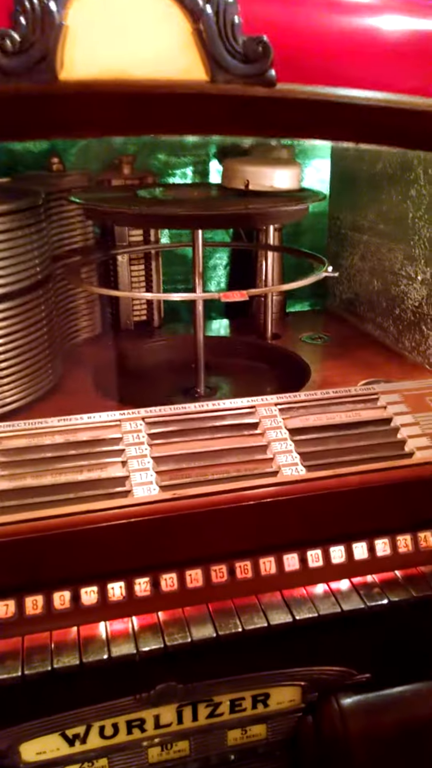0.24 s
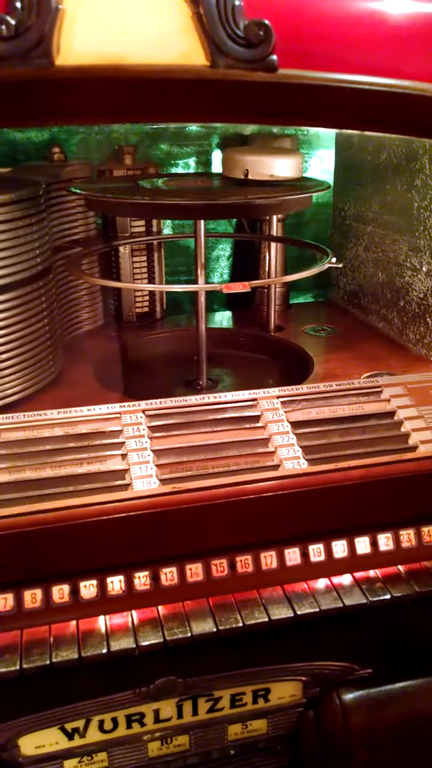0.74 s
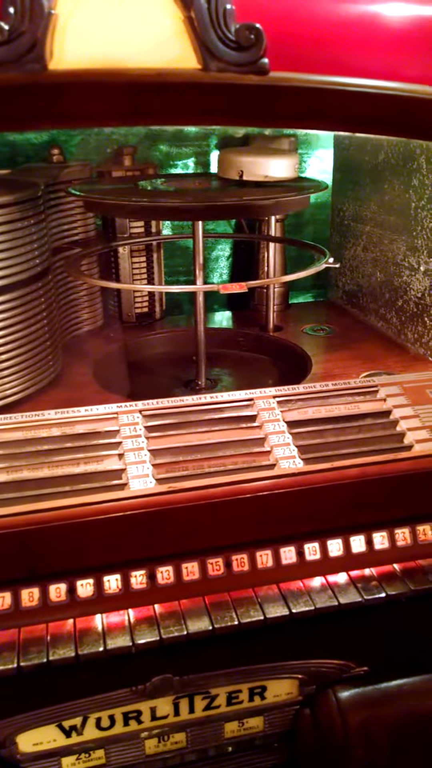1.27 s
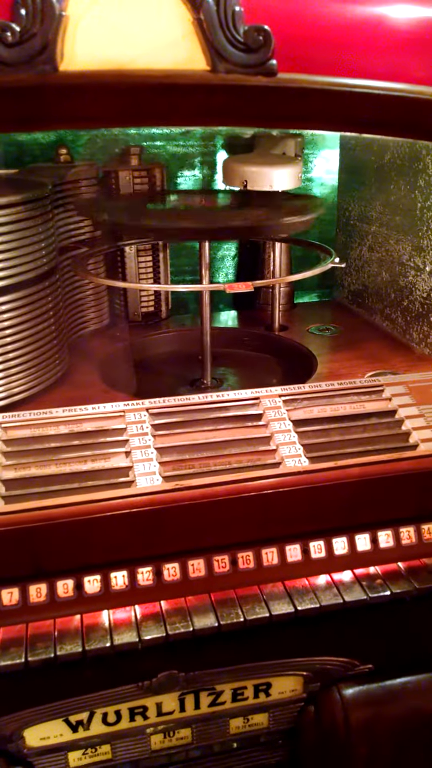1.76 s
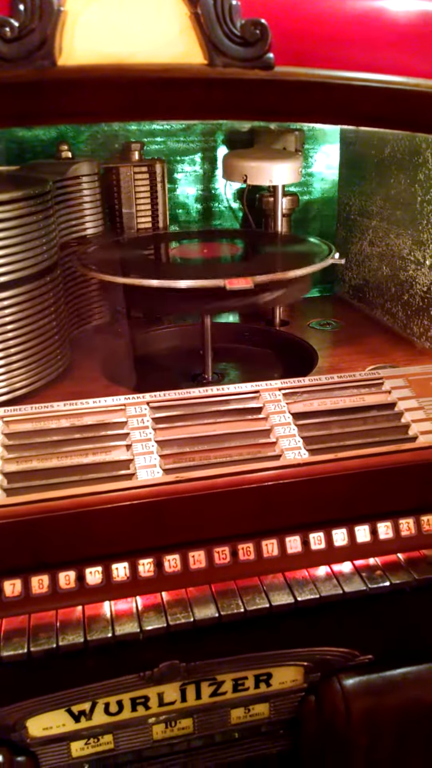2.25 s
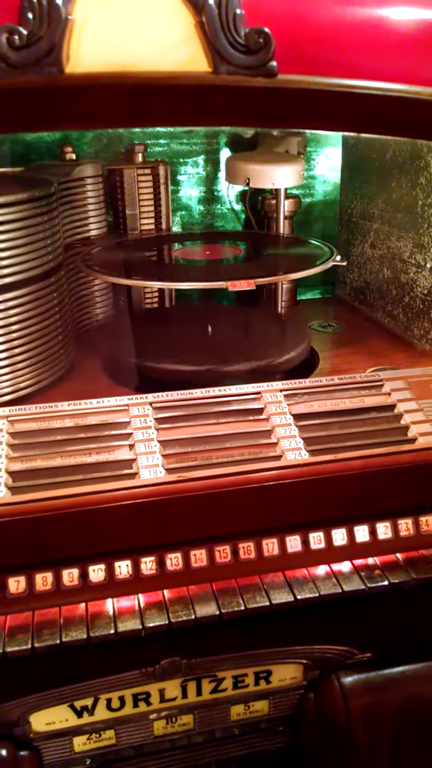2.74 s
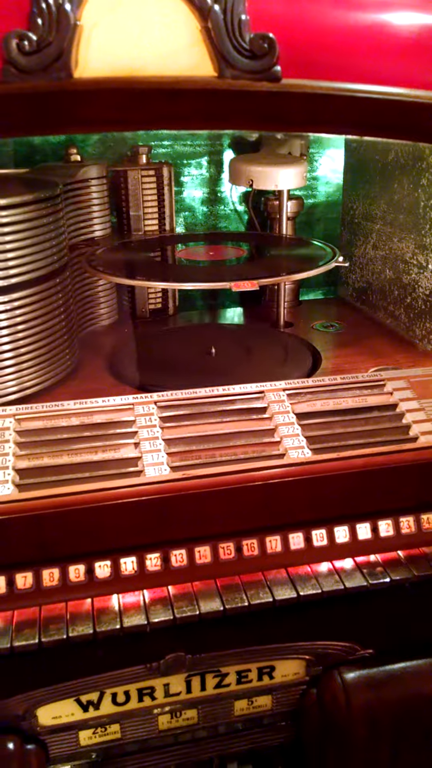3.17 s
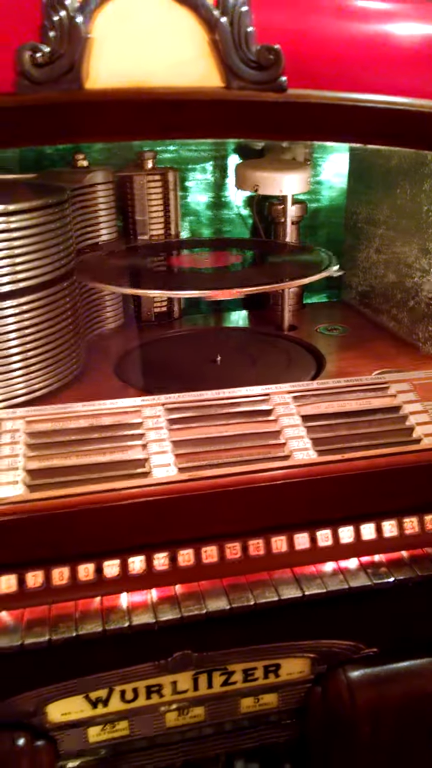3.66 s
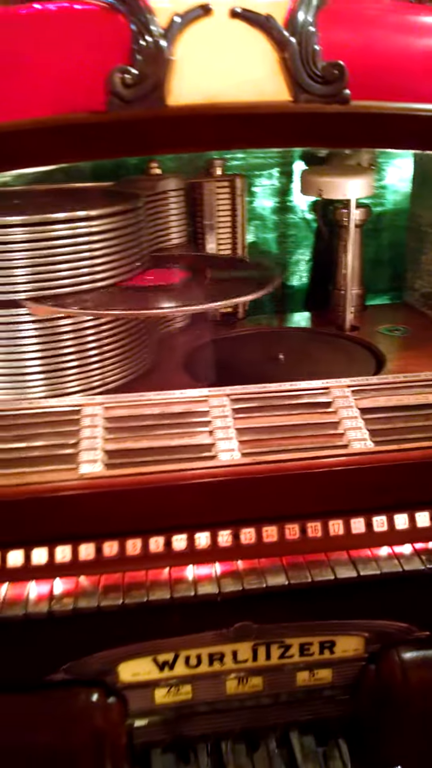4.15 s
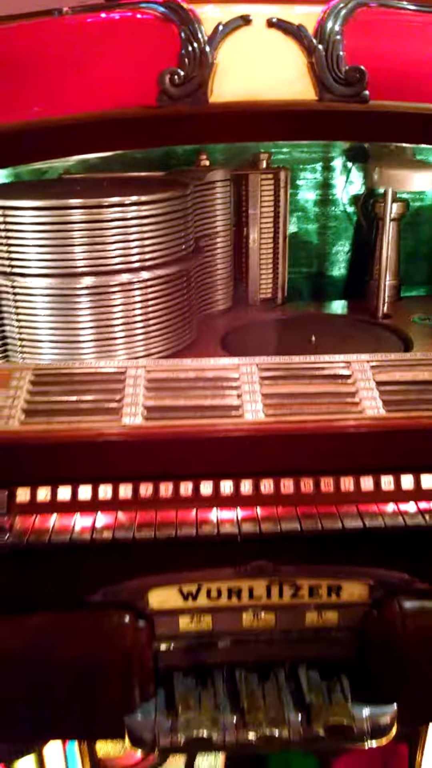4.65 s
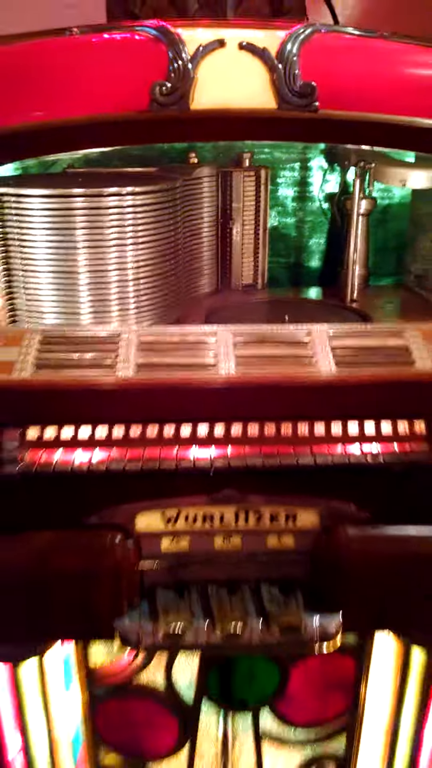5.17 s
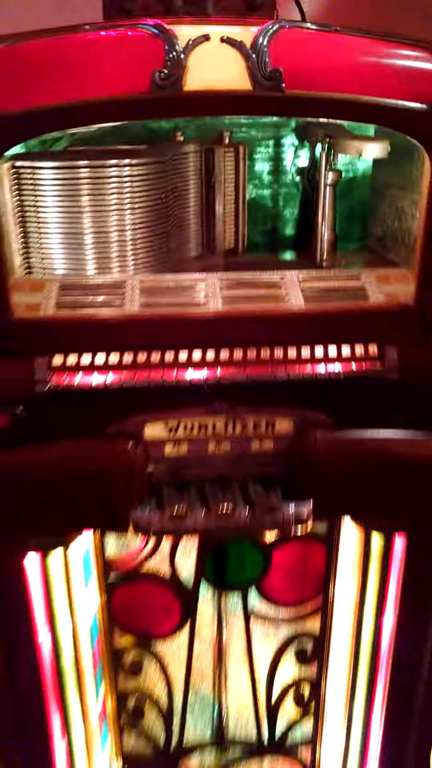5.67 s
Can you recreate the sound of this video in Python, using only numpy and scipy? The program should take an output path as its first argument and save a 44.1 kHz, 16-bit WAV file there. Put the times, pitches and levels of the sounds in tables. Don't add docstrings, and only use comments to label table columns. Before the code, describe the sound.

Close by a jukebox mechanism: gritty platter rubbing, a cluster of hard wooden clunks and steel clicks, then motor hum, light ticks and handling thumps.

```python
import sys
import numpy as np
from scipy import signal
from scipy.fft import rfft, irfft, next_fast_len
from scipy.io import wavfile
from scipy.ndimage import uniform_filter1d, map_coordinates

SR = 44100
rng = np.random.default_rng(int(sys.argv[2]) if len(sys.argv) > 2 else 0)


def level_to_linear(level):
    exponent = np.asarray(level, float) / 20
    return 10 ** exponent


def master_out(mix):
    frames = np.transpose(np.atleast_2d(mix))
    ceiling = np.clip(frames, -1, 1)
    pcm = np.round(ceiling * 32767).astype(np.int16)
    wavfile.write(sys.argv[1], SR, pcm)


N = 260631
T = np.arange(N) / SR

# pitch_hz, level_db
MURMUR = [(20, -15.5), (35, -3.5), (80, -7.5), (150, -4.5), (270, -10.5), (450, -12.5), (620, -10.5),
          (900, -20.5), (1400, -25.5), (2200, -29.5), (4000, -89)]
# pitch_hz, level_db
HISS = [(600, 9.5), (1500, -9), (2500, 5.5), (4000, -3), (7000, -1.5), (9500, 0), (11500, -2.5),
        (14200, 2.5), (16500, -3.5)]
# time_s, level_db
BUSY = [(0, 1), (1.1, -1), (1.36, 4.5), (1.59, 2.5), (1.76, -12), (2.0, 0.5), (2.73, -0.5), (3.58, 2),
        (4.26, -2.5), (4.67, -1.5), (4.83, 7.5), (5.08, -1), (5.57, 3), (5.9, -2)]
# pitch_hz, centre_db, side_db
HUM = [(60, -64, -66), (120, -47, -61), (180, -51, -60), (240, -55, -58), (300, -55, -68), (420, -57, -74),
       (480, -65, -66), (600, -65, -78), (645.4, -66, -72), (765.4, -65, -78), (885.4, -68, -69),
       (960, -71, -76), (1080, -70, -75), (1200, -72, -85), (1680, -76, -88)]
# time_s, level_db
NEAR = [
    (0, -0.5),
    (1.1, 0.5),
    (1.8, -2.5),
    (3.1, 0.5),
    (4.3, -3),
    (5, -1.5),
    (5.6, -4),
    (5.9, -4),
]
# pitch_hz, level_db, start_s, end_s
LAMP = [
    (13550, -76, 3.9, 5.2),
    (14223, -73, -1, 4.4),
    (14463, -75, -1, 4.9),
]
# time_s, pitch_hz
MOTOR = [(0, 134.5), (1, 143), (1.85, 129), (2.25, 136.5), (2.55, 137.5), (2.9, 132), (3.25, 126.5),
         (3.6, 128), (4.0, 132.5), (4.4, 135.5), (4.8, 134.5), (5.2, 137), (5.9, 139.5)]
# time_s, level_db
GRIP = [(0, -39.5), (.7, -49), (1.0, -45), (1.9, -54), (2.3, -39), (3.1, -58), (4.12, -47), (4.3, -41),
        (4.8, -33.5), (5.0, -24), (5.3, -41), (5.9, -46)]
# time_s, peak_db
PRESSES = [(.249, -25), (2.012, -32), (2.134, -23), (2.189, -27), (2.218, -19.5), (4.222, -26),
           (4.299, -32), (4.341, -13.5), (4.374, -21), (4.642, -25), (4.67, -20), (4.742, -30),
           (4.875, -28), (4.911, -36), (4.998, -17), (5.039, -15), (5.099, -27), (5.295, -28), (5.739, -22)]
# time_s, peak_db
EASES = [(4.241, -29), (4.266, -30), (4.315, -18), (4.964, -33), (5.076, -19), (5.19, -23), (5.237, -25),
         (5.65, -29)]
# time_s, level_db
SPIN = [
    (0, -45.5),
    (.3, -44.5),
    (.7, -49),
    (1.0, -49.5),
    (1.25, -48),
    (1.6, -50),
    (1.77, -48.5),
    (1.9, -67),
]
# pitch_hz, width_hz, level_db
RUB = [(2750, 1130, -7), (3405, 70, 2.5), (3596, 43, 4), (3732, 30, 5.5), (3850, 60, 0.5), (4850, 91, -3),
       (5190, 210, -1), (5530, 157, 5.5), (5870, 52, 1), (6300, 90, -5), (6500, 45, 0), (7000, 350, -7),
       (7760, 210, -9.5), (9770, 700, -14)]
# pitch_hz, width_hz, level_db
DRONE = [(578, 27, 1), (1000, 55, -2), (1303, 40, -2.5), (1446, 34, -1), (1678, 77, -3), (1983, 130, -9)]
# start_s, peak_db, pitch_hz, t60_s
BOOMS = [(.915, -26, 97, 0.15), (1.263, -24.5, 83, 0.12), (1.348, -21.5, 91, 0.094),
         (1.486, -22.5, 263, 0.058), (1.507, -12.5, 84, 0.098), (1.6699, 0.5, 295, 0.015),
         (1.673, -19.5, 185.6, 0.18), (1.6735, -3.5, 90, 0.087), (1.691, -35, 75, 0.33),
         (1.721, -32.5, 82.3, 0.44), (1.735, -21, 103, 0.16)]
# (start_s, peak_db)
PINGS = [(189, 0.098, [(1.494, -24.5), (4.858, -36), (4.912, -37)]), (305, .12, [(1.488, -29),
         (3.395, -44)]), (400, 0.084, [(1.4975, -21)]), (471.5, 0.096, [(1.345, -30.5), (1.486, -26),
         (1.499, -33), (1.675, -24)]), (622, 0.099, [(1.646, -23), (1.676, -35), (2.287, -40), (3.394, -42),
         (5.517, -39), (5.53, -36)]), (700, 0.041, [(1.6595, -24), (4.647, -38), (5.535, -35)]),
         (775, 0.16, [(4.65, -41), (4.69, -44)]), (835, 0.13, [(1.339, -31), (3.395, -39)]),
         (925, 0.1, [(1.486, -30), (3.393, -42), (4.842, -40.5)]), (1014, 0.094, [(2.292, -37.5),
         (3.394, -43), (4.91, -49.5)]), (1285, 0.058, [(1.487, -37), (1.669, -30.5)]),
         (1555, 0.18, [(1.3385, -32), (3.392, -61)]), (1740, .07, [(1.339, -26), (1.673, -35),
         (1.719, -36.5), (2.288, -42)]), (1243, 0.027, [(4.782, -38), (4.791, -35), (4.841, -30),
         (4.865, -37)]), (1410, 0.061, [(1.3372, -22), (4.683, -44.5)]), (1639, 0.064, [(1.3415, -25),
         (2.289, -35.5)]), (1907, 0.038, [(1.1205, -25), (1.3372, -14.5), (3.716, -41.5), (4.682, -27),
         (5.516, -40)]), (2150, 0.023, [(1.3368, -14.5)]), (3665, 0.034, [(1.264, -31), (1.488, -34.5),
         (1.506, -34), (1.672, -25), (1.717, -28)]), (3900, 0.065, [(2.289, -47), (3.393, -45)]),
         (4120, 0.06, [(1.338, -45)]), (5920, 0.033, [(2.287, -28.5)]), (6210, .05, [(1.338, -25)]),
         (6470, 0.035, [(1.339, -25)]), (6650, .08, [(3.392, -38), (4.776, -38)])]
# start_s, length_s, level_db
SCRAPES = [(1.108, 0.083, -45), (1.639, 0.027, -41), (2.263, 0.048, -41.5), (2.35, 0.025, -48),
           (3.715, 0.025, -47), (4.318, 0.018, -51.5), (4.529, 0.02, -49.5), (4.772, 0.022, -38),
           (4.83, 0.019, -35.5)]
# start_s, length_s
SQUEAKS = [
    (3.44, 0.13),
    (5.25, .15),
]
# pitch_hz, width_hz, level_db
TICK = [(3700, 130, -17), (4880, 1540, 9.5), (5420, 1810, 9.5), (6500, 460, 1.5), (2770, 380, 6.5)]
# pitch_hz, width_hz, level_db
FIZZ = [(7110, 920, 0.5), (9840, 2000, -2), (11000, 14000, -17), (14800, 5500, -28)]
# pitch_hz, width_hz, level_db
LEVER = [(1150, 44, -2), (1424, 78, -2), (1625, 51, 4), (1947, 143, 1), (2550, 190, 2)]
# pitch_hz, width_hz, level_db
KNOCK = [(189, 32, 2), (265, 154, -5), (323, 23.3, 3.5), (388, 31, -1.5), (588, 86, -0.5), (722, 53, -4.5),
         (923, 194, -8.5)]
# start_s, weight_db, hardness_db, t60_s
CAMS = [(0.9146, -33, 0.5, 0.068), (0.968, -41, 5, 0.071), (1.114, -30.5, 0, .06), (1.128, -34, -14, 0.099),
        (1.196, -38, -10, 0.045), (1.232, -42, -12, .05), (1.2623, -28.5, -11, 0.07),
        (1.353, -26.5, -8, 0.077), (1.3794, -40, -1, 0.22), (1.4857, -17.5, -15, 0.052),
        (1.503, -34.5, 0.5, 0.13), (1.644, -28, 1, 0.081), (1.6608, -23.5, -26, 0.11),
        (1.6696, -20.5, -9, 0.036), (1.6937, -36, -11, .072), (1.7565, -41, -7, .059),
        (1.781, -38, 0, 0.037), (2.899, -54, -11, .059), (4.5294, -50, 9, 0.11), (4.905, -40, -10, 0.094),
        (4.976, -35.5, -9.5, 0.067), (4.99, -36.5, -13, 0.054), (5.02, -53.5, 8.5, 0.077),
        (5.487, -46, 0, 0.23), (5.5284, -43.5, -5, 0.13), (5.5996, -45.5, -2, 0.082)]
# start_s, weight_db, hardness_db, t60_s
LATCHES = [(1.1197, -25, -3.5, 0.093), (1.3361, -20.5, -2.5, 0.11), (2.2849, -31.5, -6, 0.12),
           (2.353, -33, -4.5, 0.11), (3.391, -36.5, 2.5, 0.11), (3.716, -45.5, -7, 0.16),
           (4.3285, -52.5, 2, .078), (4.633, -45.5, 1.5, 0.1), (4.699, -46, -6, 0.055),
           (4.7172, -40, -6.5, 0.056), (4.744, -47, -6, 0.059), (4.806, -46, -4, .07),
           (4.872, -45, -9, 0.077), (4.932, -42.5, -7, 0.044), (4.952, -46, -10, 0.054)]
# start_s, weight_db, hardness_db, t60_s
RIMS = [(1.108, -43, 5, 0.092), (1.1964, -38, 1.5, 0.11), (1.643, -42, 12, 0.11), (2.2634, -34, -11, 0.087),
        (2.2726, -40, 4, 0.11), (4.772, -52, 22.5, 0.1), (4.829, -32, 3, 0.084)]
# start_s, weight_db, hardness_db, t60_s
PAWLS = [(1.6344, -32, -8.5, 0.08), (1.717, -29, -15, 0.078), (4.6816, -33, -11.5, 0.064),
         (4.787, -48, 1, .065), (4.8475, -41.5, 5.5, 0.056), (5.5143, -48, -4, 0.11)]
# tick_db, fizz_db, lever_db, knock_db
FEEDS = [(0, -35, -4, 0), (0, -2, 0.5, -1.5), (0, 0.5, -13, 1), (0, -6, 6.5, -1.5)]
HARDER = [1, 1.0, 0.68, 0.025]
# cam_s, latch_s, rim_s, pawl_s
ATTACK_S = [0.0008, 0.00037, 0.0016, 0.0006]
# pitch_hz, likeness
ALIKE = [(60, 0.69), (150, 0.15), (600, 0.71), (1200, 0.014), (2500, 0.042), (16000, 0.038)]
# pitch_hz, level_db
LEAN = [(60, 0.5), (200, -1), (600, 0.5), (1500, 1), (5000, 4), (14000, 0)]
# pitch_hz, share
CROSS = [(300, 0), (900, .3), (1300, .62), (2600, .97), (3950, .88), (5250, .62), (6550, .36), (9000, .2),
         (15200, .25)]
# pitch_hz, level_db
SPARED = [(1000, -30), (1300, -13), (2450, -4), (3950, -10), (5000, -7), (5400, -9), (6550, -8), (9000, -7),
          (15000, -8)]
# pitch_hz, level_db
COARSE = [(1000, -30), (1800, -13), (3000, -10), (16000, -9)]
EDGES = np.r_[0:40:4, 40:96:8, 96:144:12, 144, 160, 176, 196, 216, 240, 264, 292, 320:720:32, 720, 736]


def unit(x):
    return x / np.sqrt(np.mean(x ** 2) + 1e-20)


def along(points, hz):
    f, v = np.transpose(points)
    return np.interp(np.log(hz + 1), np.log(f + 1), v)


def curve(rows):
    s, value = np.transpose(rows)
    return np.interp(T, s, value)


def ramp(s, length):
    return np.clip((T - s) / length, 0, 1)


def wobble(rate):
    return map_coordinates(rng.standard_normal(int(N * rate / SR) + 4), [T * rate])


def noise():
    return rng.standard_normal((2, N))


def filtered(x, response):
    m = next_fast_len(N + SR // 4)
    return irfft(rfft(x, m) * response(np.fft.rfftfreq(m, 1 / SR)), m)[..., :N]


def body(modes):
    def response(f):
        g = 0
        for k, (centre, width, db) in enumerate(modes):
            damping = 1j * f * width
            g = g + (-1) ** k * level_to_linear(db) * damping / (centre * centre - f * f + damping)
        return g / np.sqrt(np.mean(np.abs(g) ** 2))
    return response


def tone(hz):
    return np.sqrt(2) * np.sin(2 * np.pi * (hz * T + rng.random()))


def background():
    busy_db = curve(BUSY)
    fast_platter = 1 - ramp(1.1, 0.38)
    hiss_db = -52 + 0.28 * busy_db + 2.5 * fast_platter
    lumps, flutter = level_to_linear(1.5 * wobble(30)), level_to_linear(.3 * wobble(10))
    murmur = unit(filtered(noise() * lumps, lambda hz: level_to_linear(along(MURMUR, hz))))
    hiss = unit(filtered(noise() * flutter, lambda hz: level_to_linear(along(HISS, hz))))
    return level_to_linear(-47.5 + busy_db) * murmur + level_to_linear(hiss_db) * hiss


def buzz(hz):
    if hz % 60:
        return tone(hz)
    return -np.sqrt(2) * np.cos(2 * np.pi * hz * T - .6 + .3 * wobble(6))


def mains_hum():
    mid = sum(level_to_linear(db + (1.8 + hz / 500) * wobble(5.12)) * buzz(hz) for hz, db, _ in HUM)
    side = sum(level_to_linear(db + 2.3 * wobble(2.8)) * tone(hz) for hz, _, db in HUM)
    return level_to_linear(curve(NEAR)) * np.array([mid + side, mid - side])


def gear_motor():
    idle_db, loaded_db, db_per_hz = -76, -48.5, 0.3
    speed = uniform_filter1d(curve(MOTOR), size=SR // 5)
    motor_db = idle_db + ramp(1.95, 0.28) * (loaded_db - idle_db) + db_per_hz * (speed - speed.mean())
    return np.sqrt(2) * level_to_linear(motor_db + 3.1 * wobble(6.9)) * np.sin(2 * np.pi * np.cumsum(speed) / SR)


def lift_whine():
    whine_db = -64.5 - 6 * np.clip(T - 3.24, 0, None)
    swell = 0.36 + 0.43 * ramp(1.7, 0.25)
    return swell * level_to_linear(whine_db + 2.6 * wobble(16)) * tone(1936.5) * level_to_linear([[0], [-6]])


def lamps():
    lamp = 0
    for hz, db, start, end in LAMP:
        faced = ramp(start, .2) * (1 - ramp(end, .2))
        lamp = lamp + level_to_linear(db + 1.5 * wobble(5.9)) * tone(hz) * faced
    return lamp * level_to_linear([[0], [-12]])


def hand_shifts(rows):
    bump_s = 0.0019
    return sum(level_to_linear(db + 2.5) * np.exp(-.5 * ((T - s) / bump_s) ** 2) for s, db in rows)


def handling():
    push = hand_shifts(PRESSES) - hand_shifts(EASES)
    bumps = filtered(push, lambda hz: (1j * hz / (1j * hz + 16)) ** 2)
    low = filtered(noise(), lambda hz: (hz / 18) ** 2 / (1 + (hz / 18) ** 2) / (1 + (hz / 70) ** 3))
    rumble = level_to_linear(curve(GRIP) - 5.0 + 2.9 * wobble(3.96)) * unit(low)
    opposed = rumble[0] * np.array([[1], [-1]])
    return bumps * np.array([[1.15], [-.85]]) + opposed + 0.2 * rumble[1]


def platter():
    rub_db = curve(SPIN)
    drone_db = -51 + 0.85 * (rub_db - rub_db[:SR].mean())
    running = np.clip((1.85 - T) / 0.056, 0, 1)
    shake = (1 + .15 * np.sin(2 * np.pi * 120 * T)) * unit(level_to_linear(2.5 * wobble(150)))
    rub = level_to_linear(rub_db + 3.0 + 1.2 * wobble(20.5)) * filtered(shake * noise(), body(RUB))
    drone = level_to_linear(drone_db + 1 + 0.4 * wobble(16.5)) * filtered(shake * noise(), body(DRONE))
    return running * (rub + drone)


def booms():
    out = 0
    for s, db, hz, t60 in BOOMS:
        t = np.clip(T - s, 0, 1)
        swell = 1 - np.exp(-1.5 * hz * t)
        out = out + level_to_linear(db - 60 * t / t60) * swell * np.sin(2 * np.pi * hz * t)
    return filtered(out, lambda hz: (1j * hz / (1j * hz + 25)) ** 2) * level_to_linear([[-3.5], [2.5]])


def pings():
    out, t = np.zeros((2, N + SR)), np.arange(SR // 4) / SR
    onset = 1 - np.exp(-t / .0004)
    for hz, t60, strikes in PINGS:
        for s, db in strikes:
            phase = 2 * np.pi * hz * t + rng.standard_normal((2, 1)) * min(hz / 4000, 1)
            out[:, round(s * SR):][:, :len(t)] += level_to_linear(db - 60 * t / t60) * onset * np.sin(phase)
    return out[:, :N]


def squeaks():
    through = sum(ramp(s, length) * (T < s + length) for s, length in SQUEAKS)
    hz = 11250 + 900 * np.sin(2.2 * through)
    swell = np.sin(np.pi * through) ** .5
    level = swell * level_to_linear(-62 + 3.2 * wobble(60))
    return level * np.sin(2 * np.pi * np.cumsum(hz) / SR) * np.array([[1], [.5]])


def scrapes():
    stroke = sum(level_to_linear(db) * (T > s) * np.exp(-((T - s) / length) ** 2) for s, length, db in SCRAPES)
    bright = unit(filtered(noise(), body([(12900, 15000, 0)])))
    return stroke * 1.26 * level_to_linear(3.1 * wobble(300)) * bright


def contacts():
    push, blow, t = np.zeros((4, N + SR)), np.zeros((4, N)), np.arange(SR // 2) / SR
    longer = np.array([[1.0], [.9], [1.1], [1.6]])
    kind_blow_db = [10, 9.3, 3, 14]
    body_blow_db = np.array([-10, -1, 0.5, 3])
    kinds = zip((CAMS, LATCHES, RIMS, PAWLS), FEEDS, ATTACK_S, kind_blow_db)
    for rows, feeds, attack, blow_db in kinds:
        onset = 1 - np.exp(-t / attack)
        for s, weight_db, hard_db, t60 in rows:
            at = round(s * SR)
            db = weight_db + np.array(feeds) + hard_db * np.array(HARDER)
            blow[:, at] = level_to_linear(db + blow_db + body_blow_db)
            cabinet_tail = level_to_linear(-17.0 - 60 * t / 0.44)
            fall = level_to_linear(-60 * t / (t60 * longer)) + cabinet_tail
            push[:, at:][:, :len(t)] += (level_to_linear(db[:, None] - 4.5) * onset * fall) ** 2
    grain = unit(level_to_linear(1.8 * wobble(500)))
    out = 0
    for rattle, first, modes in zip(np.sqrt(push[:, :N]), blow, (TICK, FIZZ, LEVER, KNOCK)):
        out = out + filtered(rattle * grain * noise() + first, body(modes))
    return out


def ports(pair):
    def turned(hz):
        angle = np.arccos(np.clip(along(ALIKE, hz), -1, 1)) / 2
        return np.array([np.cos(angle), np.sin(angle)])
    mid, side = filtered(pair, turned)
    return np.array([mid + side, mid - side])


def scene():
    spread = ports(background() + platter() + contacts())
    electric = mains_hum() + gear_motor() + lift_whine() + lamps()
    return spread + electric + handling() + booms() + pings() + squeaks() + scrapes()


def widened(dry):
    late, lag = 3.1, 17.05

    def lean(hz):
        level = level_to_linear(np.array([[1], [-1]]) * along(LEAN, hz))
        return level * np.exp(np.array([[-1j], [1j]]) * np.pi * hz * late / SR)

    def share(hz):
        return np.clip(along(CROSS, hz), 0, 1)

    def keep(hz):
        return (hz < 15830) / np.sqrt(1 + share(hz) ** 2)

    leaning = filtered(dry, lean)
    other = filtered(leaning[::-1], lambda hz: share(hz) * keep(hz) * np.exp(-2j * np.pi * hz * lag / SR))
    return filtered(leaning, keep) - other


def thinned(x):
    frame, start = 1024, 808
    n, k = np.arange(2 * frame) + .5, np.arange(frame) + .5
    window = np.sin(np.pi * n / (2 * frame))[:, None]
    basis = np.sqrt(2 / frame) * window * np.cos(np.pi / frame * np.outer(n + frame / 2, k))
    padding = ((0, 0), (2 * frame - start, 3 * frame - (N - start) % frame))
    blocks = np.pad([x[0] + x[1], x[0] - x[1]], padding).reshape(2, -1, frame)
    c = np.concatenate([blocks[:, :-1], blocks[:, 1:]], axis=2) @ basis
    hz = k * SR / (2 * frame)
    widths = np.diff(np.r_[EDGES, frame])
    band = (np.add.reduceat(c ** 2, EDGES, axis=2) / widths).repeat(widths, axis=2)
    calm = np.minimum(band, np.roll(band, 1, axis=1))
    treble = calm[:, :, 128:700].mean(axis=(0, 2))[:, None]
    top_floor = np.median(treble) * level_to_linear(2 * np.where(hz > 15500, 5, -15))
    quiet = np.where(hz > 15200, top_floor, treble * level_to_linear(2 * -14) * (hz > 7000))
    busy = treble > 2 * np.median(treble)
    whim = uniform_filter1d(rng.standard_normal((*c.shape[:2], len(EDGES))), size=2, axis=1)
    whim = whim.repeat(widths, axis=2)
    thrift = uniform_filter1d(rng.standard_normal(treble.shape), size=3, axis=0)
    bar_db = along(SPARED, hz) + 2.5 * whim + 3 * thrift - 2.5 * busy
    uncovered = band > calm[::-1] * level_to_linear(2 * bar_db)
    detail = c ** 2 > calm.mean(axis=0) * level_to_linear(2 * (along(COARSE, hz) + whim[::-1]))
    c *= uncovered & (band > quiet) & detail
    halves = (c @ basis.T).reshape(2, -1, 2, frame)
    joined = (halves[:, 1:, 0] + halves[:, :-1, 1]).reshape(2, -1)
    mid, side = joined[:, frame - start:][:, :N] / 2
    return np.array([mid + side, mid - side])


def band_limit(x):
    return signal.sosfilt(signal.butter(12, 16060, fs=SR, output="sos"), x)


def record(dry):
    mix = thinned(widened(dry))
    return band_limit(mix)


dry = scene()
out = record(dry)
master_out(out)
```